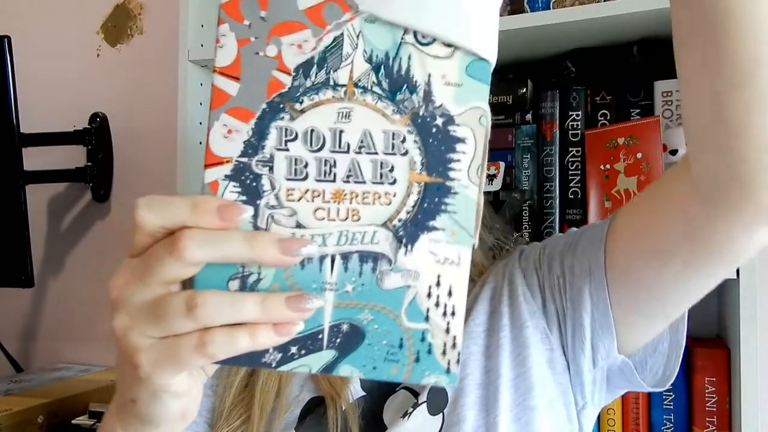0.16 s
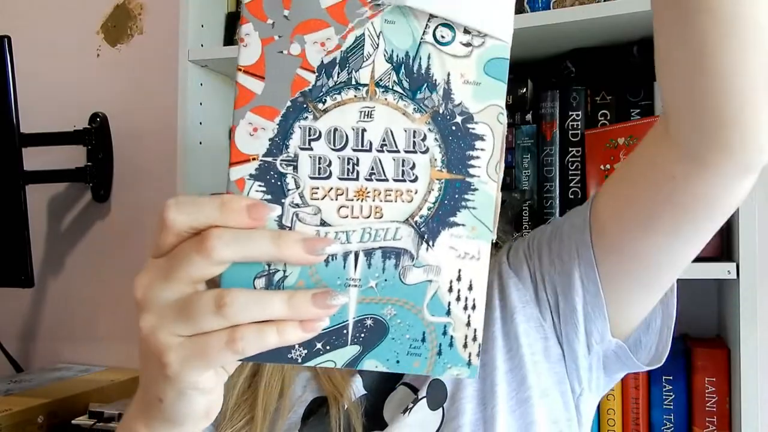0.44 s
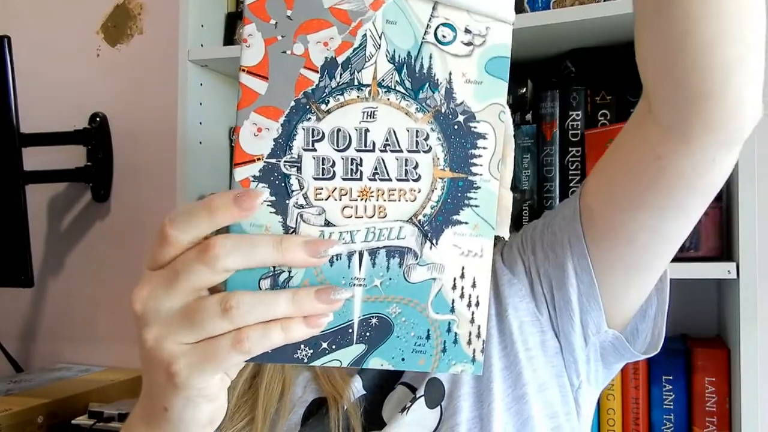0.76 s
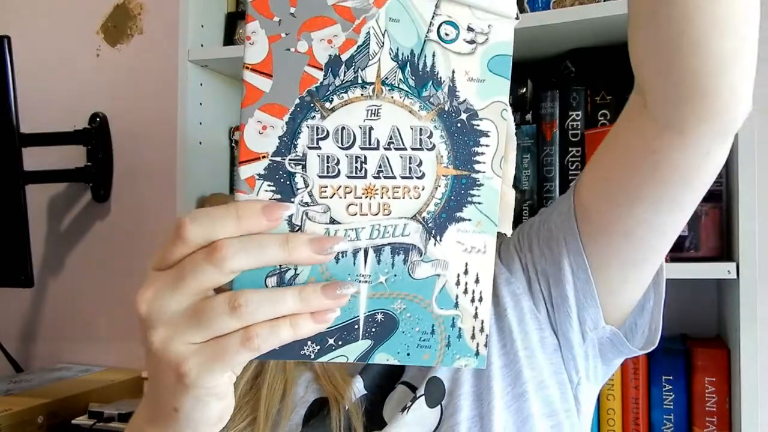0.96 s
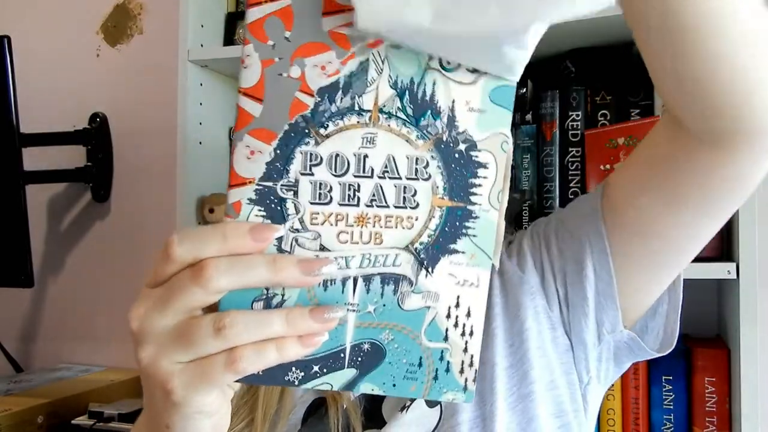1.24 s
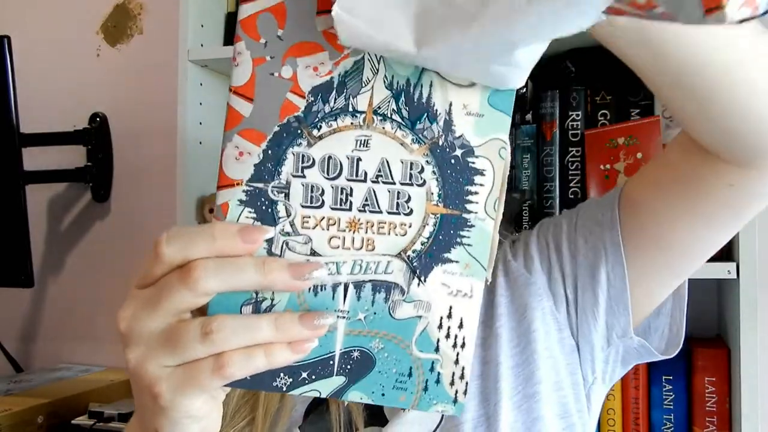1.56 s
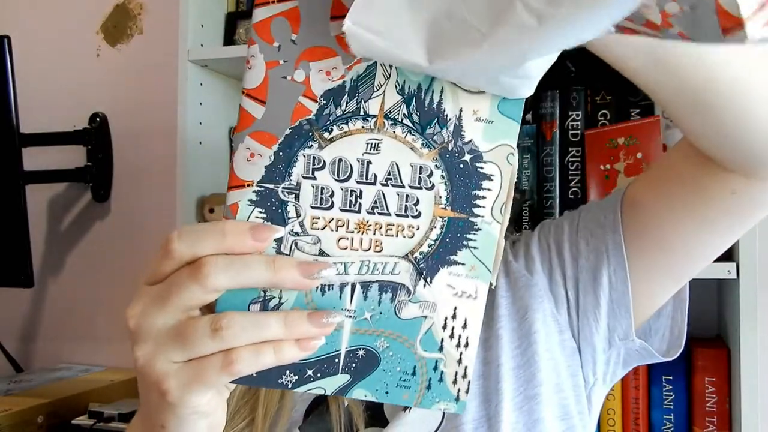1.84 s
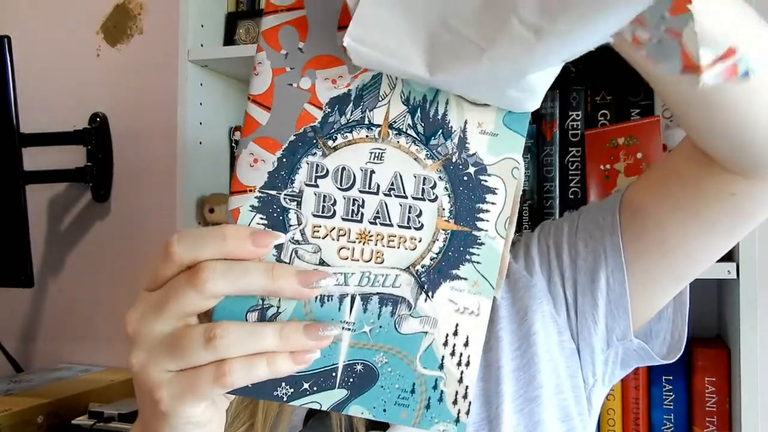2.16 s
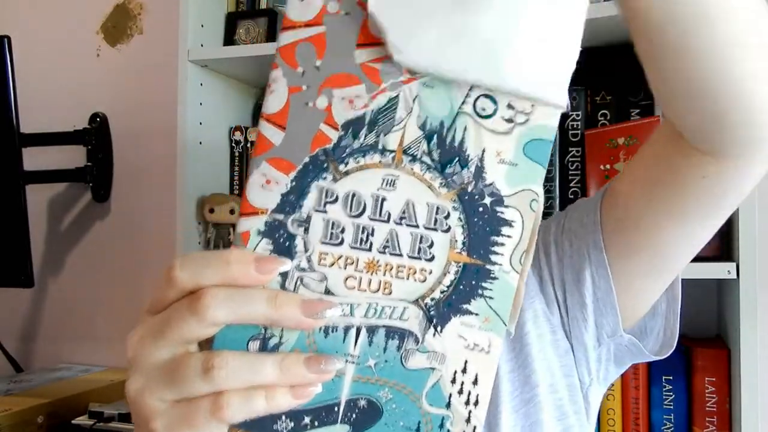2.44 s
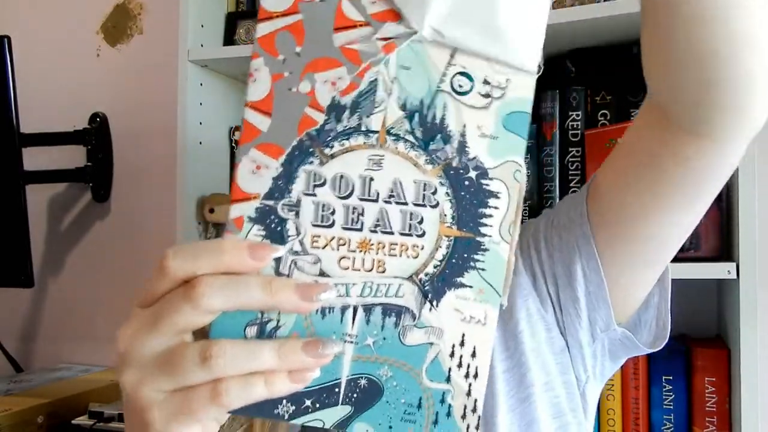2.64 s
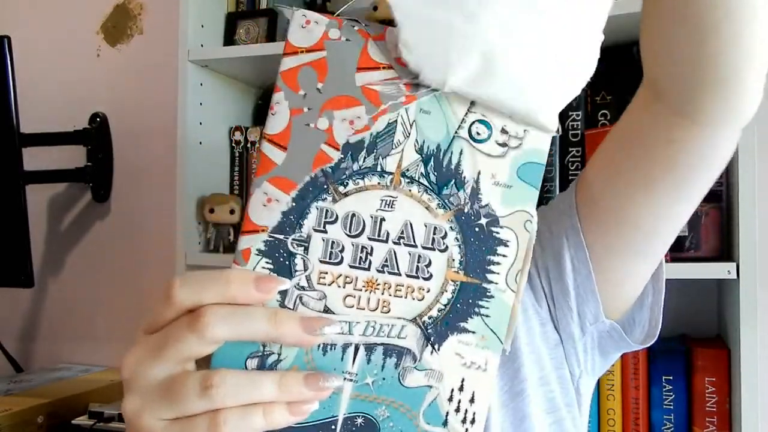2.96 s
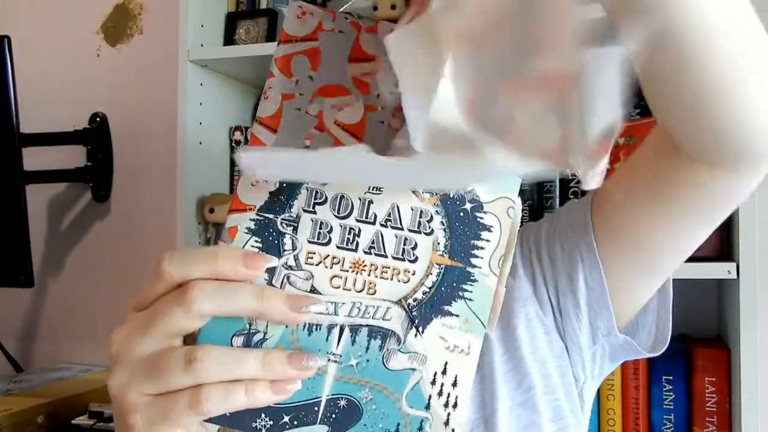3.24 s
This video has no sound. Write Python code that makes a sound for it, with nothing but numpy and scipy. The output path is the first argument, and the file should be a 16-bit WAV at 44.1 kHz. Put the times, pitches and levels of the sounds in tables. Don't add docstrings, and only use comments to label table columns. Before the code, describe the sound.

Crisp paper ripping and crinkling close up, in bursts, with low rumble from a handled book

```python
import sys
import numpy as np
from scipy import signal
from scipy.fft import rfft, irfft
from scipy.io import wavfile
from scipy.ndimage import uniform_filter1d

SR = 44100
rng = np.random.default_rng(int(sys.argv[2]) if len(sys.argv) > 2 else 0)


def makeup_ratio(level_db):
    decades = np.asarray(level_db, float) / 20
    return 10 ** decades


def generate_wav(signal):
    frames = np.transpose(np.atleast_2d(signal))
    scaled = np.clip(frames, -1, 1) * 32767
    pcm = np.round(scaled).astype(np.int16)
    wavfile.write(sys.argv[1], SR, pcm)


N = 149940

# (time [s], level [dB])
SLIDE_LEVEL = [(0, -40), (.18, -47.5), (.3, -50.5), (.42, -55), (.5, -64), (.63, -59), (.78, -66.5),
               (.98, -58), (1.15, -58), (1.35, -48), (1.7, -43), (1.86, -36), (1.93, -41), (2.2, -40),
               (2.5, -42), (2.575, -39), (2.61, -53), (2.87, -46), (3.1, -61.5), (3.4, -44.5)]


def evened(x):
    return x / np.sqrt(np.mean(x ** 2) + 1e-20)


def read(points, hz):
    f, value = np.transpose(points)
    return np.interp(np.log(hz + 1), np.log(f + 1), value)


def curve(rows):
    s, db = np.transpose(rows)
    return makeup_ratio(np.interp(np.arange(N) / SR, s, db))


def coloured(x, points):
    log_gain = np.log(makeup_ratio(read(points, abs(np.fft.fftfreq(4096, 1 / SR)))))
    min_phase = -signal.hilbert(log_gain).imag
    taps = np.fft.ifft(np.exp(log_gain + 1j * min_phase)).real[:2048]
    return signal.oaconvolve(x, taps)[:len(x)]


def slow(seconds):
    width = int(seconds * SR)
    once = uniform_filter1d(rng.standard_normal(N), width)
    return evened(uniform_filter1d(once, width))


def filtered(x, order, hz, kind="low"):
    return signal.lfilter(*signal.butter(order, hz, kind, fs=SR), x)


def swelling(t, rise_s):
    return t / rise_s * np.exp(1 - t / rise_s)


def hush():
    # (frequency [Hz], level [dB])
    hush_spectrum = [(30, -15), (233, -20), (1430, -33), (7470, -30), (16000, -36)]
    noise = rng.standard_normal((2, N))
    return makeup_ratio(-74) * np.array([evened(coloured(port, hush_spectrum)) for port in noise])


def room(x):
    # (frequency [Hz], T60 [s])
    room_t60 = [(200, 0.026), (5000, 0.054), (15000, 0.047)]
    taps = np.zeros((2, SR // 2))
    jitter = rng.integers(0, 20, (2, (SR // 2 - 81) // 20))
    at = np.arange(80, SR // 2 - 20, 20) + jitter
    np.put_along_axis(taps, at, rng.choice([-1., 1.], at.shape), 1)
    hz, t, z = signal.stft(taps, SR, nperseg=256)
    decay = makeup_ratio(-60 * t / read(room_t60, hz)[:, None])
    tail = signal.istft(z * decay, SR, nperseg=256)[1]
    return signal.fftconvolve(x[None], tail / np.linalg.norm(tail[0]), axes=1)[:, :N]


def rumble():
    # (frequency [Hz], level [dB])
    cover_spectrum = [(25, -11.5), (109, -2), (180, -3), (362, -3), (682, -4.5), (1330, -20), (2500, -19.5),
                      (16000, -28)]
    # (frequency [Hz], width [Hz], level [dB])
    boards = [
        (155, 30.5, -0.5),
        (213, 10.4, -10.5),
    ]
    rub = rng.standard_normal(N) * makeup_ratio(2.25 * slow(0.019))
    body = evened(coloured(rub, cover_spectrum))
    for hz, width_hz, db in boards:
        b, a = signal.iirpeak(hz, hz / width_hz, SR)
        mode = evened(signal.lfilter(b, a, rub))
        body = body + makeup_ratio(db - 2) * mode * makeup_ratio(1.2 * slow(.04))
    return evened(body) * curve(SLIDE_LEVEL)


def slaps():
    # (time [s], peak [dB], swell [s])
    slap_events = [(0.39, -20.5, 0.0018), (0.408, -32, 0.0018), (0.595, -31, 0.0022),
                   (0.956, -30.5, 0.0027), (2.3, -20.5, 0.0012), (2.304, -26.5, 0.0058),
                   (2.481, -19.5, 0.00094), (2.541, -22, 0.0048), (2.565, -19, 0.0011),
                   (2.707, -34, 0.0036)]
    out, t = np.zeros(N + 2000), np.arange(2000) / SR
    for s, db, swell_s in slap_events:
        body = filtered(rng.standard_normal(2000), 2, (407, 1080), 'band')
        body = body * swelling(t, swell_s)
        out[round(s * SR):][:2000] += makeup_ratio(db - 3.5) * body / abs(body).max()
    return out[:N]


def fibre_grains():
    grains_per_s, spread_db = 5000, 3.0
    size = makeup_ratio(spread_db * np.minimum(rng.exponential(1, N), 4))
    size = size * (rng.random(N) < grains_per_s / SR)
    kind, t, out = rng.integers(0, 16, N), np.arange(100) / SR, np.zeros(N)
    for k, hz in enumerate(np.geomspace(300, 15000, 16)):
        grain = np.sin(2 * np.pi * hz * t) * np.exp(-t * hz / 2.0)
        grain = grain / np.linalg.norm(grain) * np.sqrt(hz / 5000)
        out += signal.oaconvolve(size * (kind == k), grain)[:N]
    return evened(out)


def patchy_hiss():
    z = signal.stft(rng.standard_normal(N), nperseg=256)[2]
    patches = uniform_filter1d(rng.standard_normal(z.shape), 10, 0)
    patches = evened(uniform_filter1d(patches, 8, 1))
    return evened(signal.istft(z * makeup_ratio(2.1 * patches), nperseg=256)[1][:N])


def crackle():
    # (time [s], level [dB])
    strokes = [
        [(0, -31), (.075, -33), (.1, -29), (.13, -33), (.195, -28), (.27, -43), (.365, -43)],
        [(.375, -34), (.4, -29), (.425, -33), (.52, -56), (.59, -54), (.605, -40), (.68, -44), (.79, -70)],
        [(.81, -56), (.87, -60), (.955, -55), (.965, -42), (1.05, -47), (1.155, -70)],
        [(1.175, -56), (1.27, -49), (1.335, -53), (1.36, -41), (1.5, -45), (1.64, -43), (1.69, -53)],
        [(1.715, -43), (1.8, -43), (1.85, -48), (1.88, -45), (1.92, -49), (1.97, -41), (2.03, -49),
         (2.125, -50)],
        [(2.15, -44), (2.18, -49), (2.23, -43), (2.283, -38), (2.306, -22), (2.318, -30), (2.335, -36),
         (2.38, -40), (2.42, -32), (2.45, -35)],
        [(2.48, -27), (2.52, -35), (2.572, -27), (2.6, -37), (2.7, -52)],
        [(2.71, -31), (2.765, -37), (2.78, -30), (2.81, -36), (2.82, -27), (2.86, -24.5), (2.888, -27),
         (2.905, -33), (2.92, -30), (2.99, -35), (3.04, -46)],
        [(3.14, -48), (3.228, -61), (3.236, -49), (3.32, -41), (3.4, -33)],
    ]
    # (frequency [Hz], level [dB])
    paper_spectrum = [(100, -21), (480, -10.5), (1450, -4), (2300, 1.5), (6150, 0.5), (8000, 0),
                      (10500, -6.5), (16000, -13.5)]
    tearing_db, smooth_db, clump_db = -2, -2, 2.2
    thin, thin_until_s, thin_hz = .6, .33, 6000

    pull = curve([row for stroke in strokes for row in stroke])
    hard = pull ** 2 / (pull ** 2 + (makeup_ratio(tearing_db) * curve(SLIDE_LEVEL)) ** 2)
    grains = (0.42 + 0.29 * hard) * fibre_grains()
    mix = (grains + makeup_ratio(smooth_db) * patchy_hiss()) * makeup_ratio(clump_db * slow(0.014))
    mix = evened(coloured(mix, paper_spectrum)) / (1 + 0.073 * hard)

    dull = .6 * filtered(mix, 2, [4300, 7700], 'band') + .45 * filtered(mix, 2, 8000) + .1 * mix
    thinned = (1 - thin) * mix + 2 * thin * filtered(mix, 1, thin_hz, 'high')
    bright = np.where(np.arange(N) < thin_until_s * SR, thinned, mix)
    return (hard * bright + (1 - hard) * dull) * pull


def snaps():
    # (time [s], peak
    # [dB], ring [Hz])
    creases = [(0.0531, -17, 4910), (0.0689, -13, 4260), (0.0903, -14, 6460), (0.099, -14, 6850),
               (0.1155, -16, 6330), (0.138, -14, 4480), (0.1464, -13, 4610), (0.1622, -9, 5990),
               (0.1777, -12, 5210), (0.1881, -10, 4570), (0.1955, -14, 6370), (0.3027, -21, 7920),
               (0.3457, -17, 6500), (0.3725, -16, 6680), (0.3794, -14, 5500), (0.3885, -15, 6800),
               (0.3929, -1, 7240), (0.4099, -3, 7060), (0.4169, -6, 7110), (0.4215, -9, 7020),
               (0.5982, -12, 6400), (0.6348, -12, 6030), (0.6482, -27, 2330), (0.8035, -24, 7840),
               (0.887, -25, 6420), (0.9141, -21, 7490),
               (0.9591, -10, 7150), (0.9881, -32, 2280), (1.0018, -12, 6890), (1.0548, -28, 2200),
                (1.1666, -29, 4870), (1.2019, -17, 6370), (1.2214, -29, 2110), (1.2659, -19, 3000),
                (1.3134, -31, 2670), (1.3458, -18, 2410), (1.3537, -26, 6760), (1.4257, -31, 2150),
                (1.4611, -22, 6120), (1.487, -24, 3230), (1.4989, -13, 5250), (1.7907, -31, 1510),
                (1.8992, -30, 2580), (1.975, -18, 5000), (2.1382, -31, 7410), (2.2635, -11, 6630),
                (2.2995, -16, 4570), (2.306, -8, 6330), (2.3872, -16, 6850), (2.4093, -7, 2200),
               (2.3975, -20, 7000), (2.4435, -15, 7900), (2.462, -15, 5120), (2.4849, -9, 7360),
                   (2.4962, -4, 6680), (2.5287, -10, 5170), (2.5419, -10, 2330), (2.5535, -9, 7840),
                   (2.5649, -6, 2670), (2.5719, -6, 6120), (2.5844, -3, 6850), (2.6747, -24, 4780),
                   (2.7085, -11, 2450), (2.7161, -5, 6590), (2.724, -8, 7280), (2.7313, -13, 6330),
                   (2.7744, -7, 6300), (2.7966, -17, 2370), (2.8418, -11, 6240), (2.9817, -17, 2930),
                   (3.0197, -22, 5640), (3.0593, -26, 2760), (3.0978, -21, 4690), (3.1152, -25, 4100),
                   (3.2338, -34, 3570),
               (0.0084, -22, 8010), (0.1081, -17, 7360), (0.1564, -16, 6370), (0.2106, -20, 8050),
             (0.214, -25, 7410), (0.237, -25, 5770), (0.2673, -26, 6120), (0.2906, -29, 7920),
             (0.3069, -25, 6930), (0.3239, -31, 6630), (0.4488, -25, 7970), (0.4636, -29, 6850),
             (0.4774, -32, 4390), (0.4976, -36, 5940), (0.5134, -36, 2500), (0.5288, -39, 4350),
             (0.5384, -33, 3750), (0.5533, -34, 4690), (0.5686, -39, 5770), (0.5855, -41, 5170),
             (0.608, -23, 6070), (0.6118, -22, 6240), (0.6237, -20, 6330), (0.6622, -27, 7840),
             (0.6852, -29, 6370), (0.6905, -30, 6330), (0.7176, -40, 6760), (0.7348, -36, 6370),
             (0.7407, -35, 6330), (0.7811, -52, 7280), (0.789, -51, 7540), (1.1962, -32, 6630),
             (1.2388, -34, 4610), (1.2551, -37, 7320), (1.3705, -32, 5990), (1.4493, -29, 5000),
             (1.4744, -28, 6850), (1.5029, -26, 3880), (1.5489, -33, 6030), (1.7134, -35, 6850),
             (1.7196, -34, 5680), (2.1549, -37, 2500), (2.2888, -22, 6980), (2.3115, -16, 6800),
             (2.4583, -21, 2280), (2.4725, -16, 6500), (2.7072, -13, 7240), (2.749, -18, 5860),
             (2.7768, -17, 2970), (2.8205, -18, 7920), (2.8608, -16, 5250), (2.8694, -14, 6200),
             (2.8902, -18, 5000), (2.8978, -21, 6120), (2.95, -23, 10640), (3.066, -31, 8740),
             (3.1527, -35, 5340), (3.1984, -41, 3060), (3.2023, -39, 4780), (3.275, -33, 2200)]
    # (frequency [Hz], level [dB])
    snap_spectrum = [(100, -35), (700, -11), (1420, -8.5), (2690, -3.5), (5770, -1), (7140, 3),
                     (9600, -5.5), (16000, -9)]
    burst_s, ring_t60_s, ring_db = .0003, 0.0093, 0
    thump_hz, thump_t60_s, thump_db = 495, 0.019, -24
    after_t60_s, after_db = 0.014, -16.5

    out, t = np.zeros(N + 4000), np.arange(4000) / SR
    click = coloured(1. * (t == 0), snap_spectrum)[:300]
    for s, db, hz in creases:
        noise, u = rng.standard_normal(4000), rng.random(2)
        rise_s = burst_s * (6500 / hz) ** .7
        swell = swelling(t, rise_s)
        burst = np.convolve(noise * swell, click)[:4000]
        burst = filtered(burst, 1, min(0.95 * hz, 18000))
        ring = swell * makeup_ratio(-60 * t / ring_t60_s) * np.sin(2 * np.pi * hz * t)
        crack = burst / abs(burst).max() + makeup_ratio(ring_db) * ring / abs(ring).max()
        thump = np.sin(2 * np.pi * thump_hz * (.5 + u[0]) * t)
        thump = makeup_ratio(thump_db - 60 * t / thump_t60_s) * thump
        rustle = evened(np.convolve(noise[::-1], click[:60])[:4000])
        rustle = makeup_ratio(after_db - 60 * t / after_t60_s) * rustle
        at = round((s - rise_s) * SR)
        out[at:at + 4000] += makeup_ratio(db - 1.5) * (crack / abs(crack).max() + thump + rustle)
    return out[:N]


def scattered(x):
    scatter = rfft(rng.standard_normal(900) * np.exp(-np.arange(900) / 400), 2048)
    taps = np.roll(irfft(scatter / abs(scatter)), 1024)
    return signal.oaconvolve(x, taps, "same")


def scene():
    apart, room_db = 0.27, -10.5
    sheet, rub = crackle(), rumble()
    paper = snaps() + slaps() + sheet
    near = paper + rub
    unalike = apart * (scattered(paper) + rumble()) * [[1], [-1]]
    background = hush()
    return near + unalike + makeup_ratio(room_db) * room(near) + background


def low_pass(x):
    return signal.sosfilt(signal.butter(12, 16300, fs=SR, output="sos"), x)


def record(dry):
    # (frequency [Hz], difference [dB])
    port_lean = [(60, 2.5), (950, 6), (3770, 2.5), (15000, 0)]
    notch_hz, notch_width_hz, notch_depth = 1401, 193, 0.51
    hz = np.fft.rfftfreq(N, 1 / SR)
    body = 1 - notch_depth * np.exp(-((hz - notch_hz) / notch_width_hz) ** 2)
    body = body / (1 + (hz / 15750) ** 80)
    lean = makeup_ratio(np.outer([.5, -.5], read(port_lean, hz)))
    delay = np.exp(1j * np.outer([.5, -.5], -.6 * (hz / 12700) ** 2))
    return low_pass(irfft(rfft(dry) * body * lean * delay, N))


dry = scene()
out = record(dry)
generate_wav(out)
```